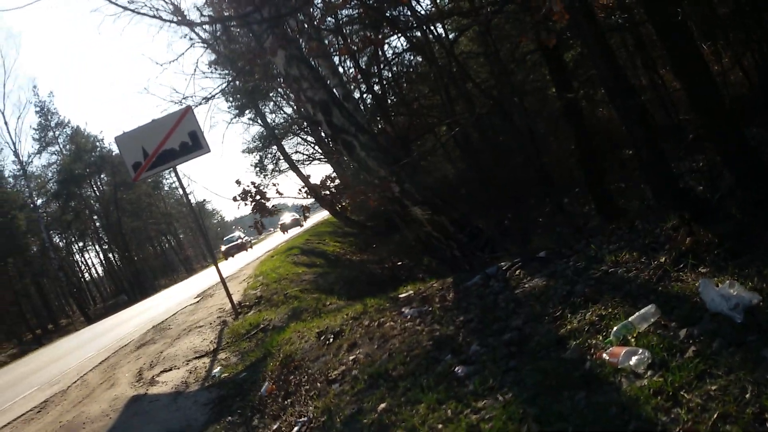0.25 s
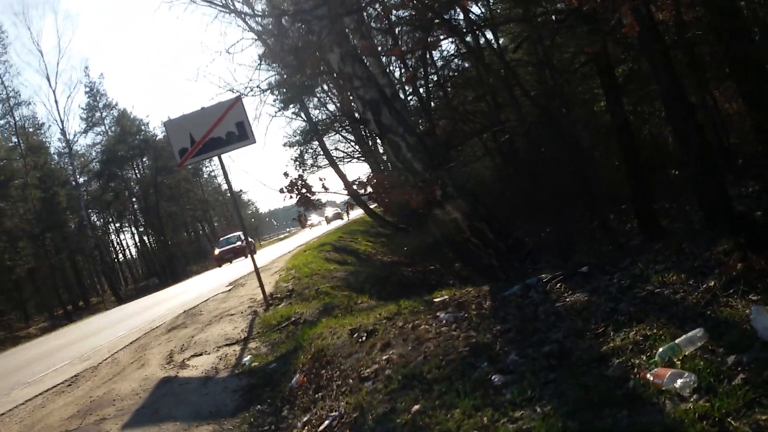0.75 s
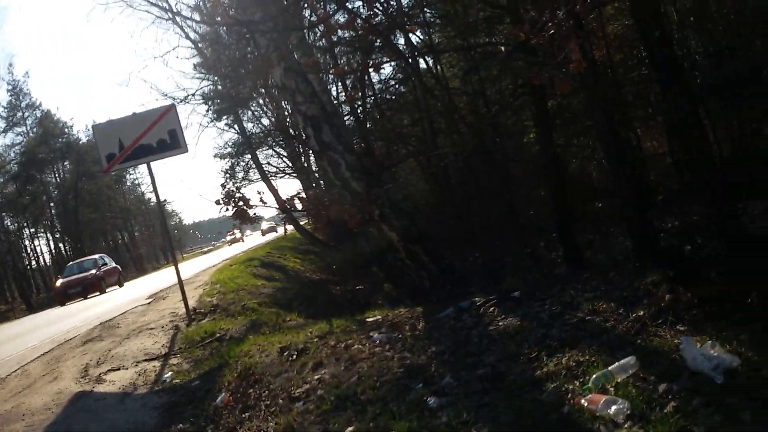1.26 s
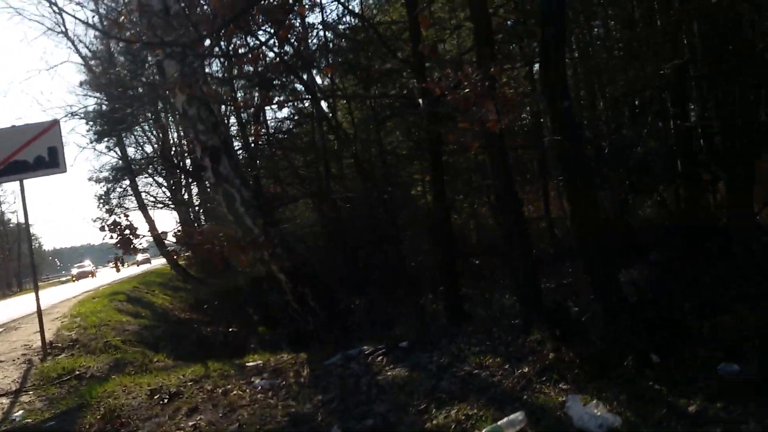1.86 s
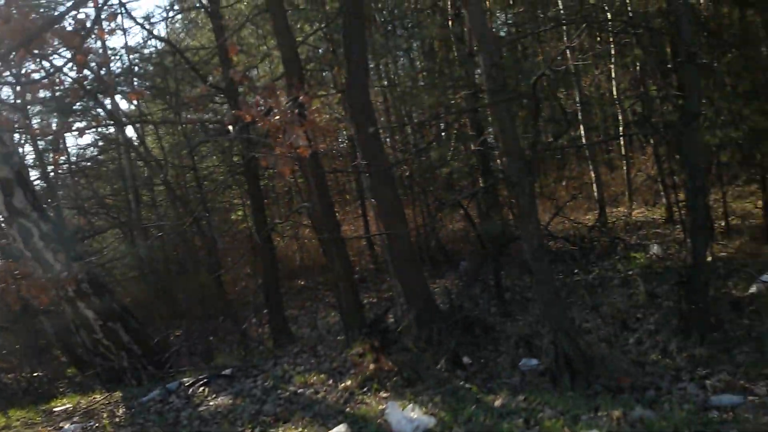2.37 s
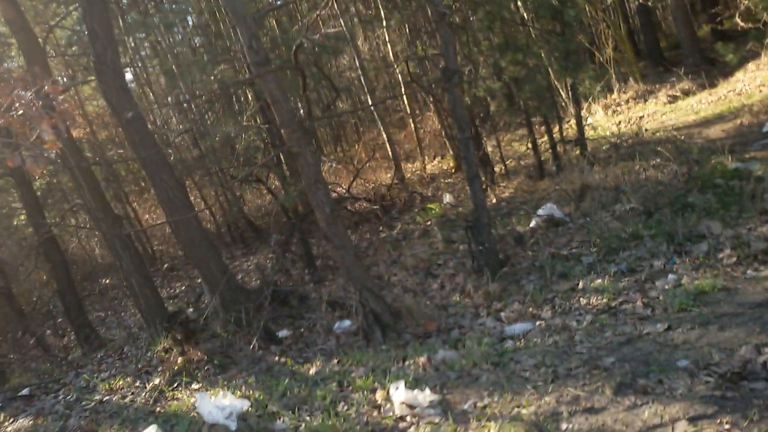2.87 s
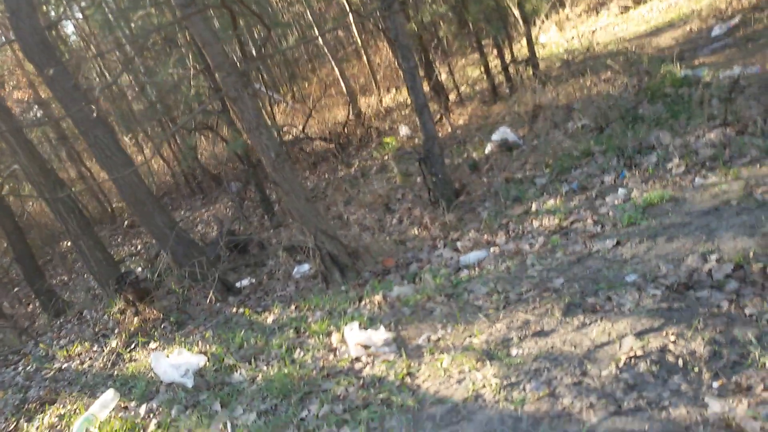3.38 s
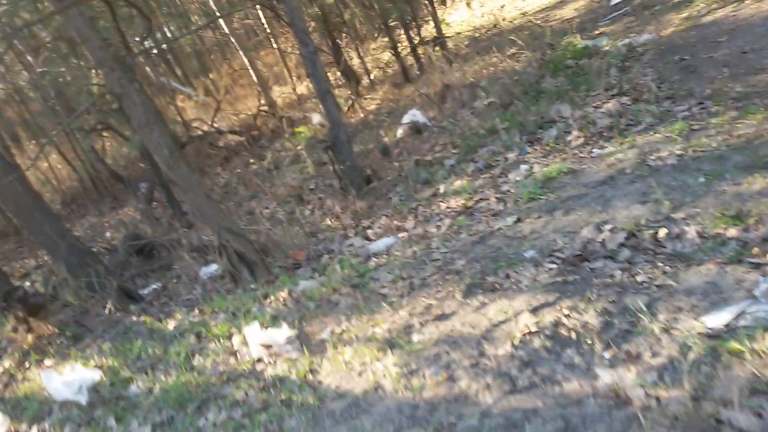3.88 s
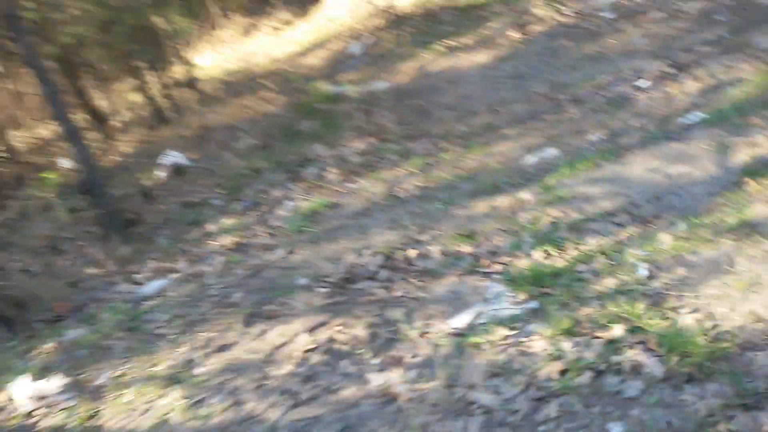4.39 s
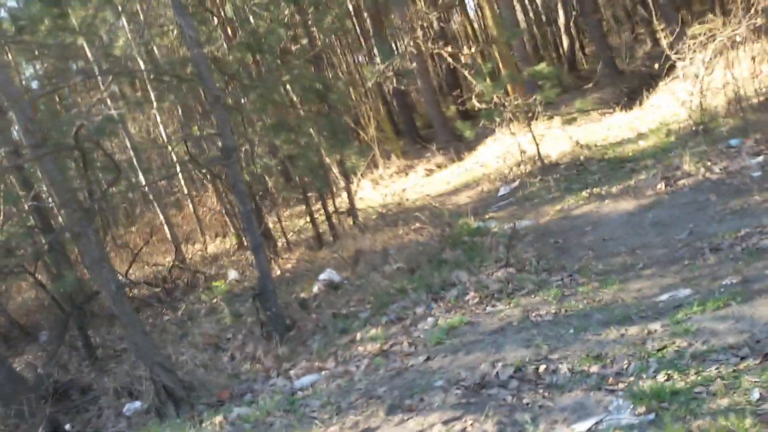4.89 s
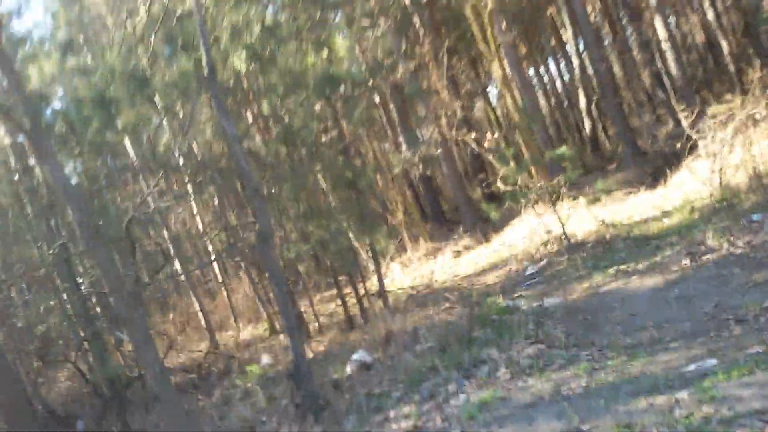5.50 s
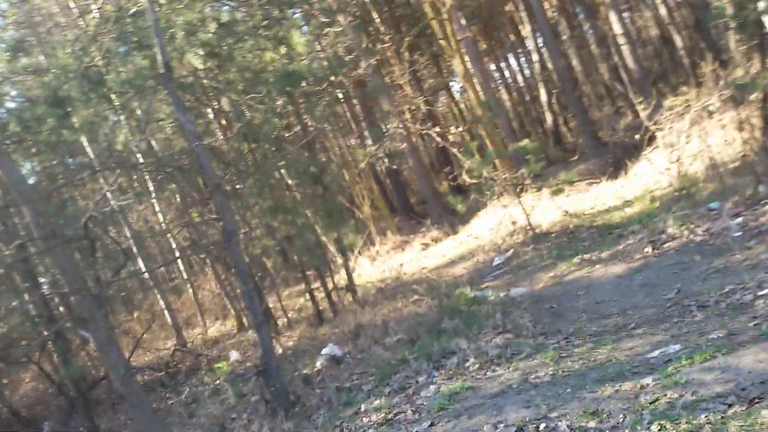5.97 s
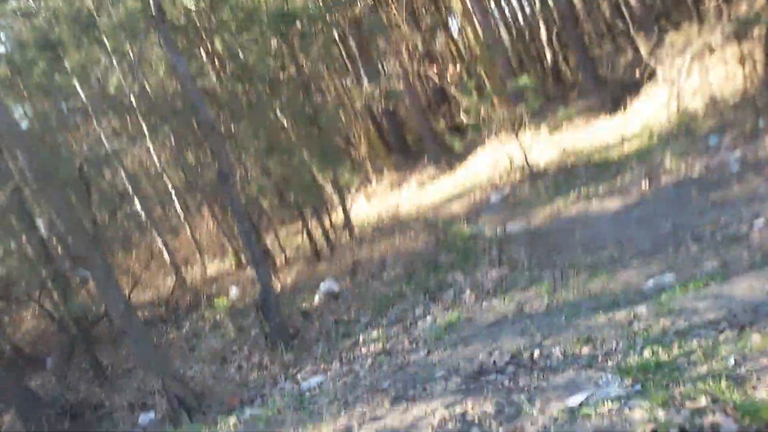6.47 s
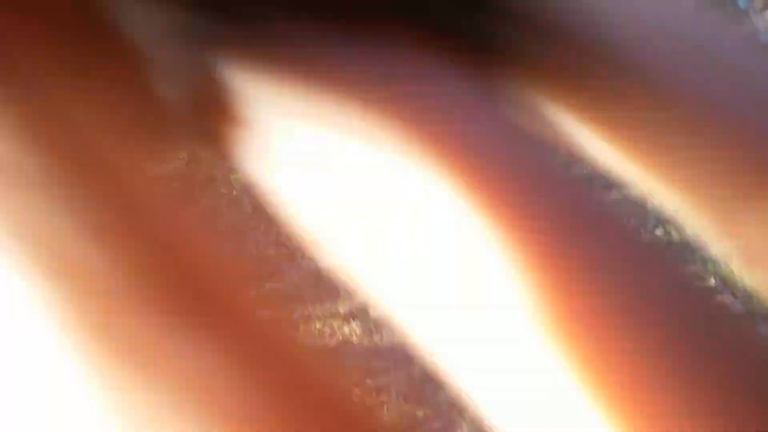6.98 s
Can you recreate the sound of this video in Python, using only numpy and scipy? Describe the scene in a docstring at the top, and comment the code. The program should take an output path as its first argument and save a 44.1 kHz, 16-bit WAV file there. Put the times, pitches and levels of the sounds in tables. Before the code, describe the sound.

Very close handling bumps, rustling fabric and scratchy zipper clicks over passing traffic, then a quick zip whining upward and a metallic jingle.

```python
"""At the edge of a roadside wood, a jacket zip is worked close to a phone while cars roar past behind.
Tyre roar and cloth are shaped noise; the hand's jolts are swelling and fading tones with a noisy crunch.
Single teeth and ticking metal are band-limited impulses; a hard knock leaves a rattle and a hum.
In a short slip and one fast stroke, tooth rate sets the pitch: the stroke whines up and down.
The metal tab jingles as a sum of decaying modes."""
import sys
import numpy as np
from scipy import signal
from scipy.fft import rfft, irfft, next_fast_len
from scipy.io import wavfile
from scipy.ndimage import uniform_filter1d

SR = 44100
rng = np.random.default_rng(int(sys.argv[2]) if len(sys.argv) > 2 else 0)


def digitize_waveform(pressure):
    """Quantize a signal to 16-bit integers and store it at the path in sys.argv[1].

    Rows of a 2-D input are taken as channels; values are limited to [-1, 1].
    """
    field = np.atleast_2d(pressure).T
    bounded = np.clip(field, -1, 1)
    quanta = np.round(bounded * 32767).astype(np.int16)
    wavfile.write(sys.argv[1], SR, quanta)


N = 319284
T = np.arange(N) / SR  # time in s

# passing cars, tyre roar: time_s, level_db
CAR_LEVELS = [(0.0, -25.5), (0.574, -30), (1.122, -39), (1.671, -27), (2.749, -23), (3.542, -29),
              (3.78, -35), (4.4, -36.5), (4.914, -18.5), (5.418, -14.5), (5.742, -23), (5.83, -32),
              (6.1, -41), (6.565, -35), (6.805, -29), (7.239, -35)]
# spectral density of tyre roar: frequency_hz, relative_density_db
TYRE_SPECTRUM = [(200, 3.5), (500, -2), (1000, 0), (1450, 1), (1800, 1.5), (2000, -5), (2450, -4.5),
                 (3300, -15), (7000, -38), (8500, -102)]
# change of colour for the last car: frequency_hz, gain_db
LAST_CAR_COLOUR = [(300, -7.5), (430, 6), (700, -1), (960, 1.5), (1500, -2.5), (2200, -5)]
# separate scrapes of fabric: peak_s, level_db, swell_ms, fade_ms
FABRIC_SCRAPES = [(.585, -38.5, 39, 130), (2.25, -34, 410, 1200), (2.86, -30, 13, 60), (2.999, -22, 26, 77),
                  (3.2, -28, 110, 12), (3.435, -23, 82, 22), (3.69, -25.5, 110, 37), (3.731, -17, 15, 21),
                  (3.791, -24, 33, 23), (3.914, -24, 19, 55), (4.17, -34, 270, 114), (4.6, -32, 59, 530),
                  (6.43, -33, 40, 70), (6.571, -30.5, 37, 77), (6.75, -28.5, 60, 50), (6.825, -24, 18, 32),
                  (6.945, -15, 3.1, 2.4), (6.962, -26, 2.9, 21), (7.063, -26.5, 11, 20),
                  (7.235, -35, 98, 55)]
# spectral density of scraping cloth and of zip clicks: frequency_hz, relative_density_db
SCRAPE_SPECTRUM = [(800, -47.5), (2000, -6.5), (3300, -3.5), (4800, -1), (6000, -10.5), (8000, -22.5),
                   (9500, -39), (14000, -74)]
# rumble of hand and traffic through the case: time_s, level_db
CASE_RUMBLE_LEVELS = [(0.0, -24.5), (0.599, -19.5), (0.978, -36.5), (1.327, -37.5), (1.931, -25.5),
                      (3.118, -21.5), (3.517, -25.5), (3.657, -14.5), (3.776, -32.5), (3.93, -24),
                      (4.49, -30), (4.819, -24), (5.2, -13.5), (5.657, -22), (5.722, -35), (5.812, -22.5),
                      (5.917, -45), (6.79, -29), (7.239, -35)]
# spectral density of that rumble: frequency_hz, relative_density_db
RUMBLE_SPECTRUM = [(20, -26.5), (45, 2.5), (110, 7.5), (200, 2.5), (380, -1.5), (700, -13), (1500, -89.5)]
# jolts of cloth and hand through the case: time_s, level_db, settled_pitch_hz, length_ms
HAND_JOLTS = [(0.045, -6, 121, 23), (0.212, -9.5, 106.5, 53), (0.551, -10.5, 816, 18), (0.552, -1, 294, 16),
              (0.576, -2.5, 123, 24), (0.617, -10.5, 604, 5), (0.647, -7, 100, 12), (0.665, -14, 500, 4),
              (1.537, -12.5, 115, 17), (1.885, -11, 144, 18), (1.911, -13, 107, 47), (1.982, -9, 260, 4.6),
              (2.088, -12, 102, 18), (2.185, -9, 143, 11.4), (2.246, -9, 137, 14), (2.318, -10.5, 142, 13),
              (2.369, -10.5, 156, 12), (2.429, -7, 179, 9.4), (2.483, -11.5, 176, 19),
              (2.54, -12.5, 159, 11), (2.614, -8.5, 153, 18), (2.747, -5.5, 130, 7.1),
              (2.855, -6.5, 97.6, 28), (2.969, -4, 156, 10.5), (3.025, -8, 155, 19), (3.078, -10, 140, 23),
              (3.125, -9, 95, 27), (3.211, -3, 163, 12), (3.424, -6, 147, 3.9), (3.607, 0.5, 85, 14),
              (3.645, -5.5, 70.5, 27), (3.693, -5.5, 102, 19), (3.722, -7.5, 190, 12),
              (3.913, -13.5, 172, 14), (4.03, -11.5, 238, 5.4), (4.091, -5.5, 141, 18),
              (4.178, -10.5, 229, 9), (4.629, -12, 100, 24), (5.472, 2, 107, 10), (5.803, -3, 125, 8),
              (5.845, -7.5, 105.5, 15.2), (6.261, -19.5, 93.5, 33), (6.576, -11.5, 101, 8.3),
              (6.641, -14, 334, 5.4), (6.757, -13, 130, 13), (6.811, -9.5, 202, 35),
              (6.969, -18.5, 131, 14)]
# something loose shaking after the hard knock: start_s, period_s, level_db, fall_db (per shake)
LOOSE_RATTLE = (.549, .0371, -26, 1.85)
# what rings after the hard knock: pitch_hz, level_db, t60_s
KNOCK_HUM = [(80.7, -14.5, 1.02), (330.4, -17, 1.24)]
# slider snapping over single teeth, muffled by cloth: start_s, level_db
TOOTH_SNAPS = [(0.5495, -12), (0.6168, -17), (2.243, -19), (2.315, -11), (2.3656, -14), (2.4115, -13.5),
               (2.4778, -11.5), (2.6095, -14), (2.7415, -10), (2.966, -18), (3.1319, -9), (3.209, -14),
               (3.4436, -15), (3.6058, -10.5), (3.6983, -12), (3.807, -15), (3.9117, -12.5), (3.924, -20),
               (3.9395, -20), (3.965, -19), (3.994, -18), (4.029, -23), (4.059, -23), (4.096, -18.5),
               (5.139, -10.5), (5.3498, -7), (5.8035, -14), (6.252, -24.5), (6.641, -14), (6.7994, -7.5),
               (6.8068, -5), (6.835, -8), (6.8467, -11), (6.859, -12), (6.975, -15), (6.999, -22),
               (7.009, -13), (7.0601, -9.5), (7.108, -17), (7.119, -14)]
# bare metal ticking, thin and bright: start_s, level_db
METAL_TICKS = [(0.584, -18), (1.919, -20.5), (1.991, -23.5), (3.7564, -4.5), (3.7887, -5), (4.355, -27),
               (4.83, -21), (5.322, -15), (5.4698, -15.5), (5.8458, -1.5), (5.8546, -8), (5.8639, -3.5),
               (5.8848, -9), (5.8986, -12), (6.7455, -8), (6.7566, -6), (6.946, -8), (6.958, -6)]
# a short slip of the slider: time_s, tooth_rate_hz, thud_db
SLIDER_SLIP = [(4.694, 270, -21), (4.706, 490, -25), (4.73, 720, -26)]
# the fast stroke: time_s, tooth_rate_hz, thud_db
FAST_STROKE = [(5.55, 109, -29), (5.6, 136, -20.5), (5.63, 230, -21), (5.66, 454, -20), (5.695, 600, -20.5),
               (5.722, 780, -29.5), (5.747, 765, -24.5), (5.762, 620, -16), (5.774, 370, -12.5),
               (5.792, 280, -16.5)]
# the tab swinging free until it touches cloth: start_s, level_db, length_ms
TAB_JINGLES = [(6.756, -22, 28), (6.846, -25, 40), (6.965, -28, 38), (7.036, -28, 25)]
# modes of the pull tab: pitch_hz, level_db, t60_s
TAB_MODES = [(4480, 0, .2), (11500, -15, .12)]

LAST_CAR_S = 4.18
HISS_DB, HISS_FOLLOWS = -16.5, 0.95  # hiss at a road level of 0 dB; its change per dB of road
EDGE_DB = -10  # fall over one swell or fade
NEAR_S, NEAR_DB = 6.28, -4  # the cloth comes up to the microphone and its top end is heard
RISE_SHARE = 0.26  # part of a jolt's length spent swelling
FULL_TEETH_HZ, CLICK_DB_PER_OCTAVE = 755, 3  # reference tooth rate; clicks grow with speed
TAKE_UP_S, LET_GO_S = 0.03, 0.012  # the pull takes hold; the stroke dies as the slider stops
TOP_HZ = 15000


def undb(db):
    """Decibels are twenty times the logarithm of amplitude; this is the inverse."""
    return 10 ** (np.asarray(db) / 20)


def unit(x):
    """Mean power fixes level: the signal is scaled to rms 1."""
    return x / np.sqrt(np.mean(x ** 2))


def curves(table):
    """Linear interpolation in time makes each column a continuous control."""
    s, *columns = np.transpose(table)
    return [np.interp(T, s, c) for c in columns]


def walk(rate):
    """Smoothed chance: random levels held 1 / rate s and slewed twice, with spread near 1."""
    k = int(SR / rate)
    steps = np.repeat(rng.standard_normal(N // k + 1), k)
    return 1.25 * uniform_filter1d(uniform_filter1d(steps, k), k)[:N]


def colour(x, shape):
    """Spectral weighting by (Hz, dB) points; returns the spectrum and its log-frequency axis."""
    size = next_fast_len(N)
    octave = np.log2(np.maximum(np.arange(size // 2 + 1), 1) * SR / size)
    hz, db = np.transpose(shape)
    gain = undb(np.interp(octave, np.log2(hz), db))
    return rfft(x, size) * gain, octave


def flicker(x, shape, rate, flicker_db):
    """Independent amplitude modulation of overlapping octave bands makes coloured sound waver."""
    spectrum, octave = colour(x, shape)
    out = 0
    for centre in range(4, 15):
        weight = np.clip(1 - abs(octave - centre), 0, 1)
        part = irfft(spectrum * weight)[:N]
        out = out + part * undb(flicker_db * walk(rate))
    return unit(out)


def grains(grain_db):
    """Impulsive noise: Gaussian samples of exponentially distributed dB gain form uneven specks."""
    return rng.standard_normal(N) * undb(grain_db * rng.exponential(size=N))


def band(x, hz, width):
    """A band-pass filter keeps the region around its centre frequency."""
    edges = [hz - width / 2, hz + width / 2]
    return signal.sosfilt(signal.butter(2, edges, "band", fs=SR, output="sos"), x)


def add(out, s, sound):
    """Superposition: a short sound is summed in at time s."""
    i = int(s * SR)
    out[i:i + len(sound)] += sound[:N - i]


def road():
    """Broadband tyre noise: coloured random sound swells with each passing car."""
    roar = flicker(rng.standard_normal(N), TYRE_SPECTRUM, 8, 1.3)
    last = irfft(colour(roar, LAST_CAR_COLOUR)[0])[:N]
    last_share = np.clip(2 * (T - LAST_CAR_S), 0, 1)
    return undb(curves(CAR_LEVELS)[0]) * (roar + last_share * (last - roar))


def scrapes():
    """Powers add: the fabric's gain joins swelling and fading scrapes to a hiss following the road."""
    power = undb(HISS_DB + HISS_FOLLOWS * curves(CAR_LEVELS)[0]) ** 2
    for s, db, swell_ms, fade_ms in FABRIC_SCRAPES:
        ms = 1000 * (T - s)
        edge = np.maximum(-ms / swell_ms, ms / fade_ms)
        power = power + undb(db + EDGE_DB * edge) ** 2
    return np.sqrt(power)


def cloth():
    """Friction noise: fabric scrapes as bright grit in the air and rumbles through the case."""
    grit = grains(2.6) * undb(2.4 * walk(140))
    scrape = flicker(grit, SCRAPE_SPECTRUM, 30, 0.48)
    top_end = unit(band(band(grit, 5300, 6600), 6900, 6800))
    nearness = np.clip((T - NEAR_S) / 0.065, 0, 1)
    scrape = scrape + nearness * undb(NEAR_DB) * top_end
    rumble = flicker(grains(1.8), RUMBLE_SPECTRUM, 20, 2.2)
    return scrapes() * scrape + undb(curves(CASE_RUMBLE_LEVELS)[0]) * rumble


def jolts():
    """Damped rebound: a dull push with a crunch on top sags and wobbles in pitch as the cloth gives."""
    out, t = np.zeros(N), T[:SR // 8]
    chances = rng.standard_normal((len(HAND_JOLTS), len(t)))
    for (s, db, hz, ms), chance in zip(HAND_JOLTS, chances):
        u = 1000 * t / (RISE_SHARE * ms)
        envelope = u * np.exp(1 - u)  # peaks at 1 when u is 1
        wobble = np.cumsum(uniform_filter1d(chance, size=150)) * 0.025
        phase = 2 * np.pi * hz * t * (1 + 0.55 * np.exp(-t / 0.0065)) + wobble
        crunch = 3 * np.exp(-t / 0.01) * band(band(chance, 505, 690), 505, 690)
        # each push begins 2 ms ahead of its listed time
        add(out, s - .002, -undb(db) * envelope * (np.sin(phase) + crunch))
    return out


def rattle():
    """Periodic impact: regular bursts of bright grit over a throbbing modal hum die away."""
    start, period, burst_db, fall_db = LOOSE_RATTLE
    shake = (T - start) / period
    level = undb(burst_db - fall_db * shake + 1.5 * walk(27))
    gate = (T > start) * np.exp(-(shake % 1 / .4) ** 2) * level
    grit = gate * unit(band(grains(1.5), 4800, 900) + .3 * band(grains(1.5), 6200, 2000))
    t = np.maximum(T - start, 0)
    throb = 1 + .5 * np.cos(2 * np.pi * (shake - .4))
    hum = 0
    for hz, db, t60 in KNOCK_HUM:
        tone = np.sin(2 * np.pi * hz * t + 2.5 * walk(30.76))
        hum = hum + undb(db) * tone * 1000. ** (-t / t60)
    return grit + (t > 0) * throb * hum


def snaps(table, centre_hz, top_hz):
    """Impulse excitation: a sharp crack fills a broad band of chance centre, with grit behind it."""
    out, t = np.zeros(N), T[:SR // 40]
    dull = signal.butter(5, top_hz, fs=SR, output="sos")
    for (s, db), chance in zip(table, rng.standard_normal((len(table), len(t)))):
        hz = centre_hz * 1.12 ** chance[-1]
        grit = chance * (0.2 * np.exp(-t / 0.001) + 0.02 * np.exp(-t / 0.004))
        crack = signal.sosfilt(dull, band((t == 0) + grit, hz, 1.1 * hz))
        # the peak stands 3 dB above the listed level, as in a sine of that rms
        add(out, s, np.sqrt(2) * undb(db) * crack / abs(crack).max())
    return out


def stroke(table, click_db, edge):
    """Repetition pitch: each tooth passing the slider gives one click and one thud."""
    rate, thud_db = curves(table)
    start, stop = table[0][0], table[-1][0]
    on = (T > start) & (T < stop)
    phase = np.cumsum(rate * on) / SR + .04 * walk(250)  # in teeth, slightly uneven
    passing = np.diff(np.floor(np.maximum.accumulate(phase)), prepend=0)
    tooth = passing * undb(2 * rng.standard_normal(N))
    grit = 1.3 * np.exp(-(phase % 1) / .6) * rng.standard_normal(N)
    click = irfft(colour(tooth * np.sqrt(SR / rate) + grit, SCRAPE_SPECTRUM)[0])[:N]
    click = np.gradient(click) * undb(2 * walk(70))  # thin and uneven
    force = undb(click_db + CLICK_DB_PER_OCTAVE * np.log2(rate / FULL_TEETH_HZ))
    force = force * np.clip((T - start) / TAKE_UP_S, 0, 1)
    turn = 2 * np.pi * phase
    thud = np.cos(turn) * undb(3.5 * walk(170))
    # overtones of a contact that hardens with speed
    overtones = sum(np.cos(k * turn + k * k) * undb(3 * walk(200)) / k for k in range(2, 7))
    thud += edge * np.sqrt(rate / FULL_TEETH_HZ) * overtones
    let_go = np.clip((stop - T) / LET_GO_S, 0, 1)
    clicks = click / click[on].std() * force
    return on * let_go * (clicks - np.sqrt(2) * thud * undb(thud_db))


def jingles():
    """Modal decay: the metal tab rings in its own modes until the cloth cuts it short."""
    out, t = np.zeros(N), T[:SR // 12]
    ring = sum(undb(db) * np.sin(2 * np.pi * hz * t) * 1000. ** (-t / t60) for hz, db, t60 in TAB_MODES)
    for s, db, ms in TAB_JINGLES:
        add(out, s, undb(db) * ring * np.exp(-(1000 * t / ms) ** 4))
    return out


def scene():
    """Linear superposition: the pressures of all sources add at one microphone."""
    background = road() + cloth()
    knocks = jolts() + rattle()
    teeth = snaps(TOOTH_SNAPS, centre_hz=3940, top_hz=6300)
    ticks = snaps(METAL_TICKS, centre_hz=4420, top_hz=10600)
    slip = stroke(SLIDER_SLIP, click_db=-31, edge=0.045)
    fast = stroke(FAST_STROKE, click_db=-16.0, edge=1.67)
    return (background + knocks + teeth + ticks + slip + fast + jingles())[None]


def record(dry):
    """Saturation and band limiting: the phone rounds only the loudest peaks and cuts the top."""
    loud = dry / (1 + abs(dry) ** 8) ** (1 / 8)
    return signal.sosfilt(signal.ellip(10, .2, 90, TOP_HZ, fs=SR, output="sos"), loud)


dry = scene()
out = record(dry)
digitize_waveform(out)
```